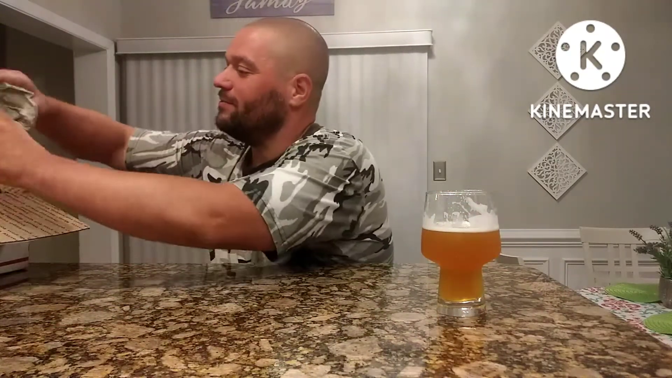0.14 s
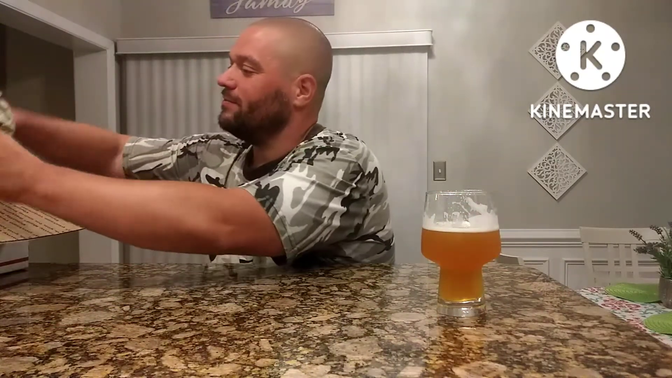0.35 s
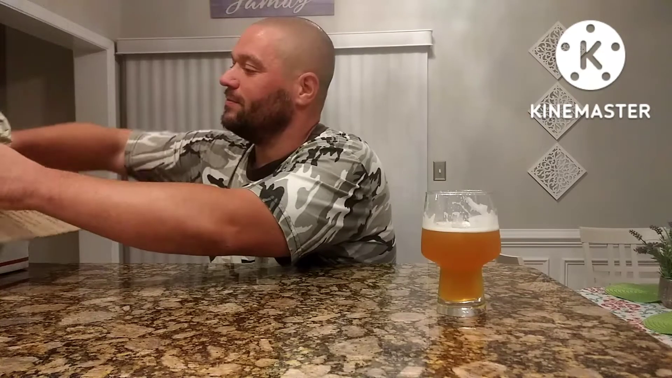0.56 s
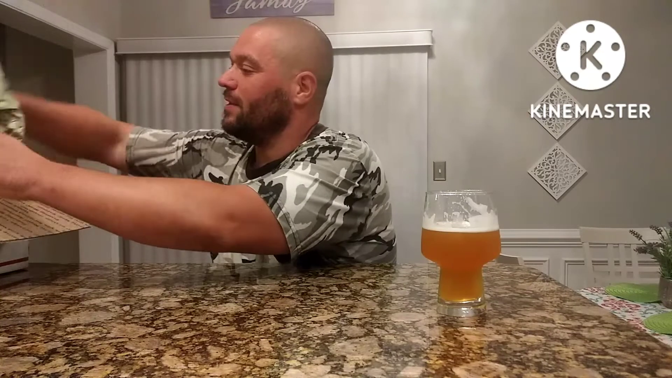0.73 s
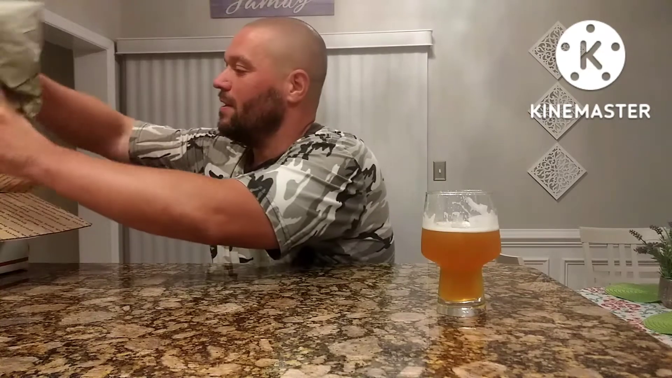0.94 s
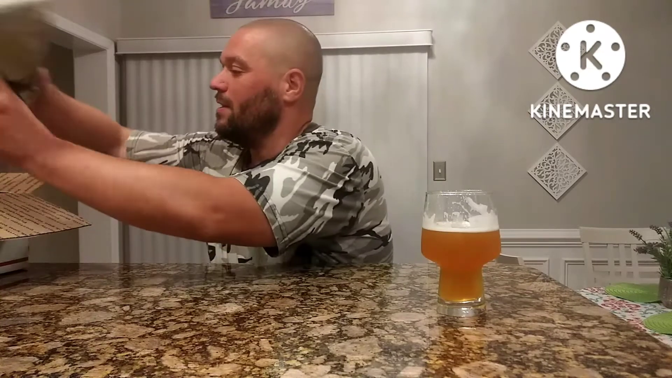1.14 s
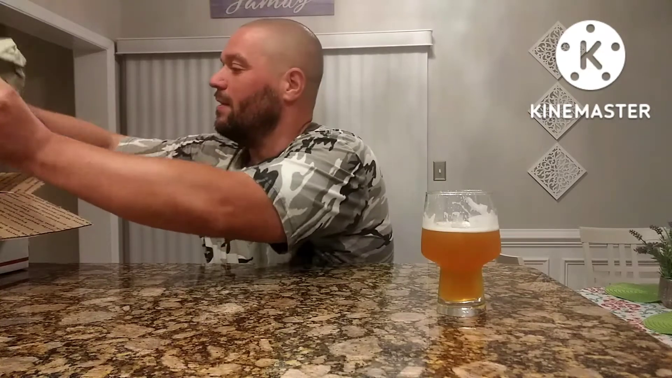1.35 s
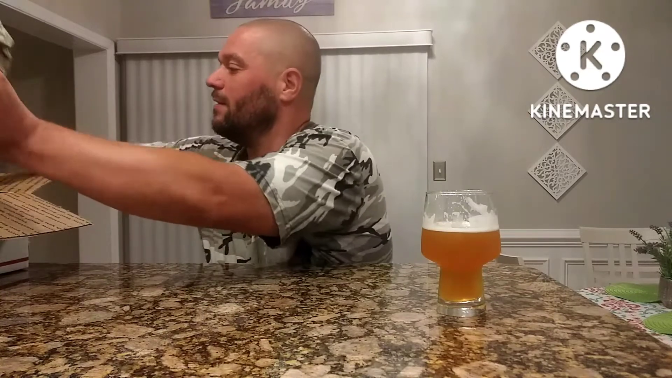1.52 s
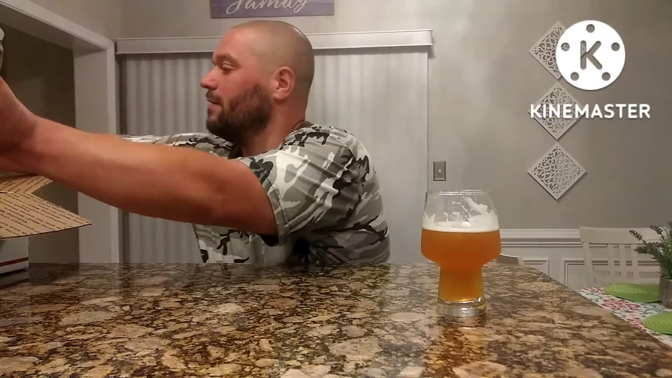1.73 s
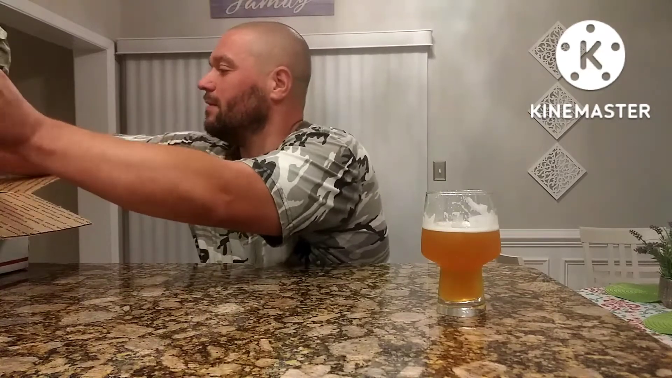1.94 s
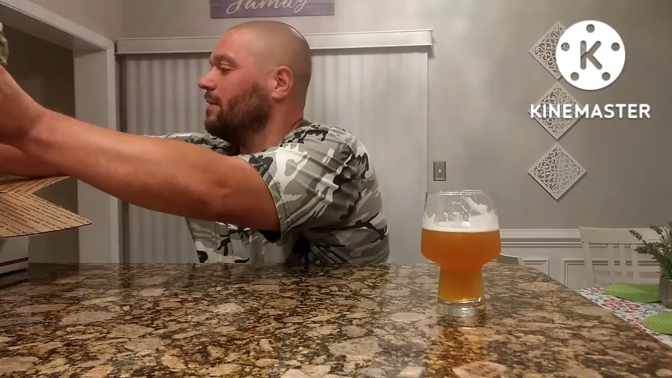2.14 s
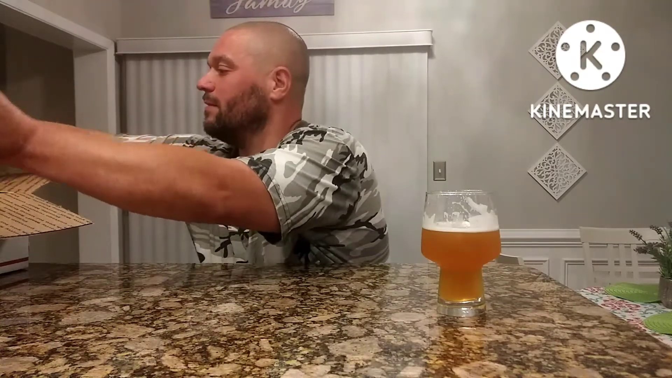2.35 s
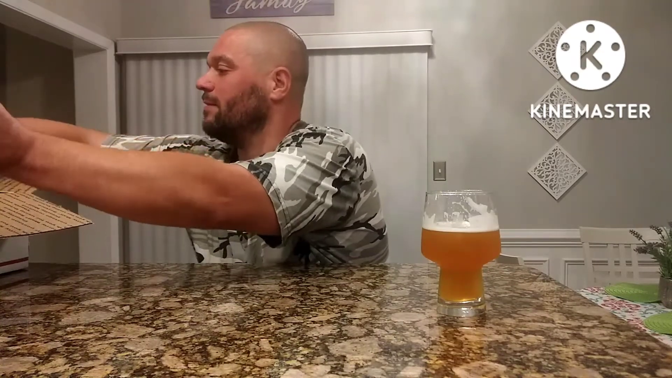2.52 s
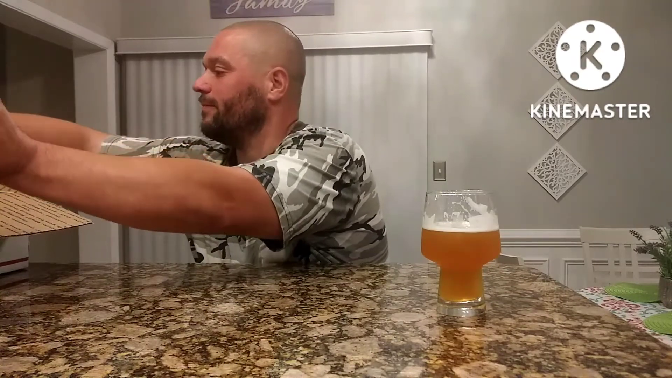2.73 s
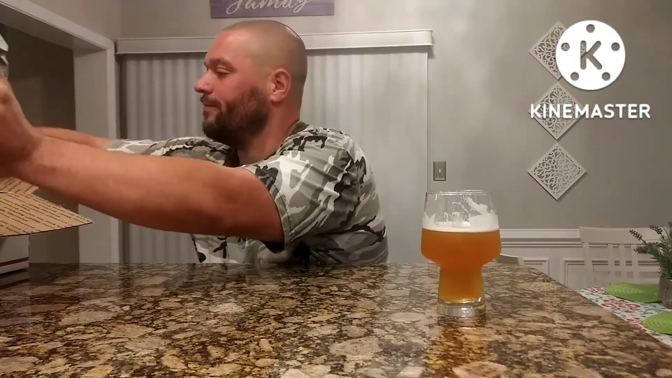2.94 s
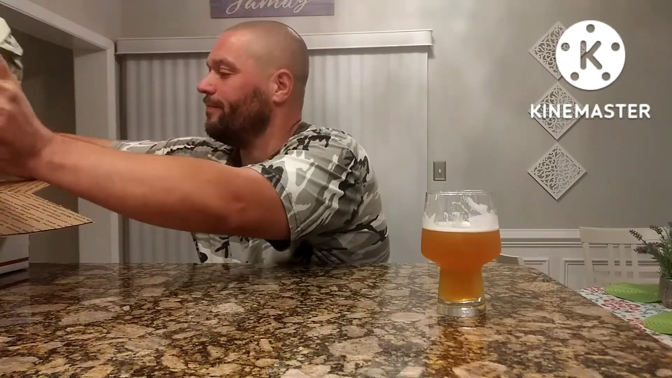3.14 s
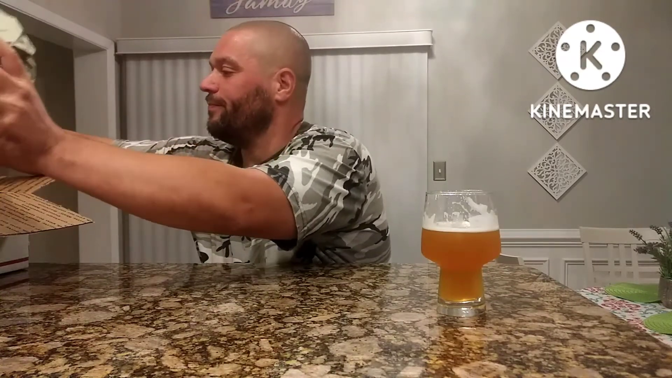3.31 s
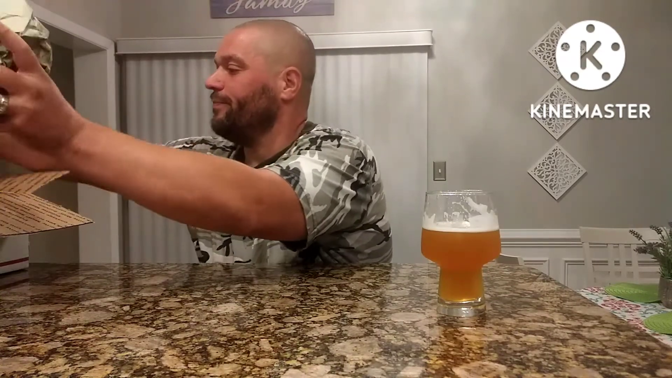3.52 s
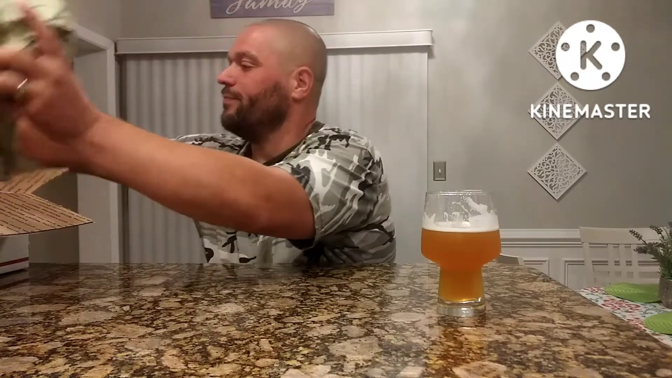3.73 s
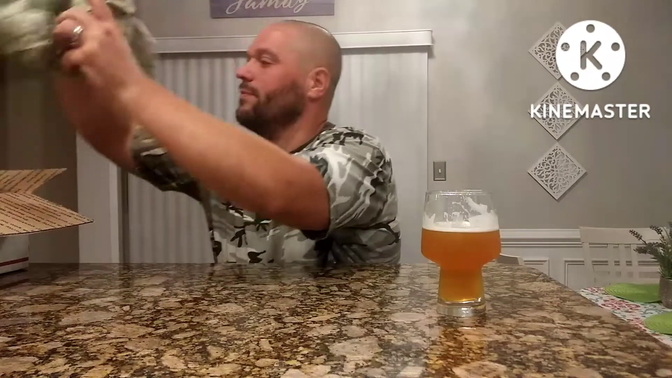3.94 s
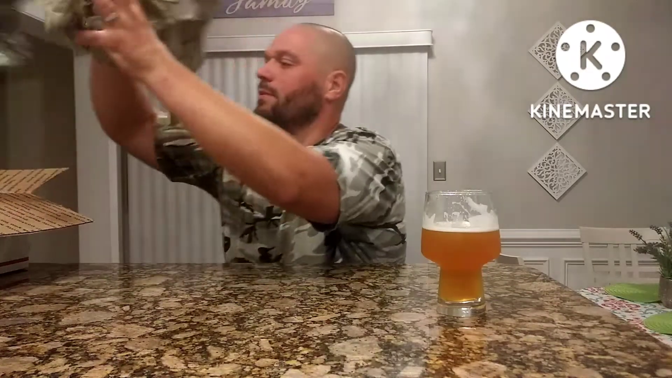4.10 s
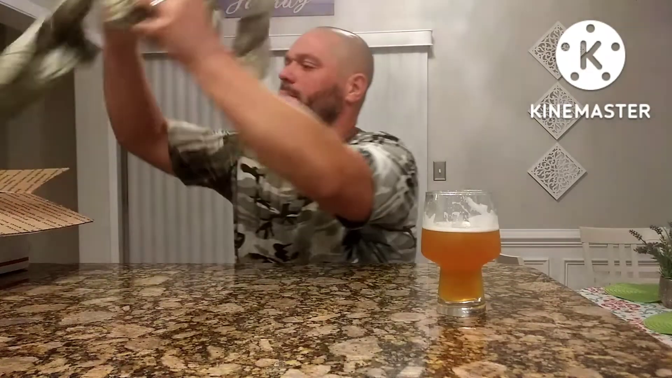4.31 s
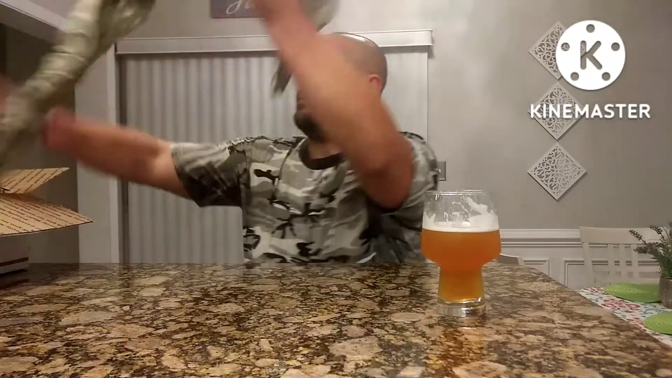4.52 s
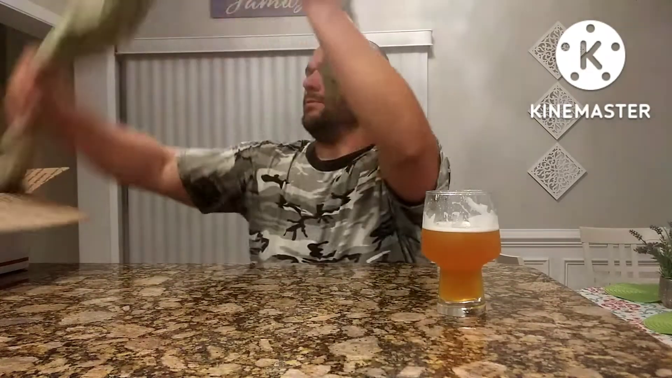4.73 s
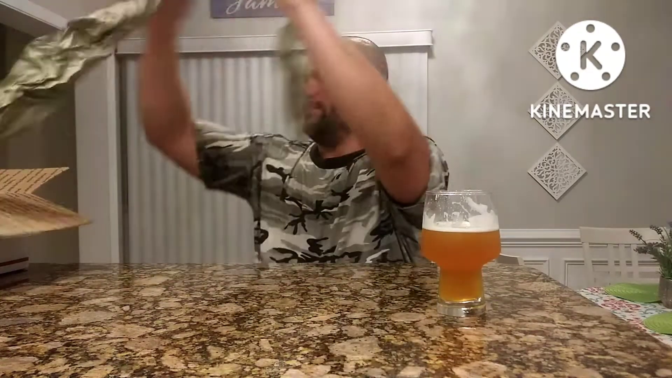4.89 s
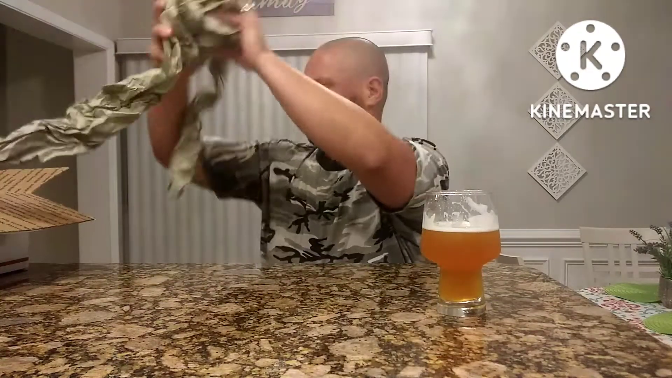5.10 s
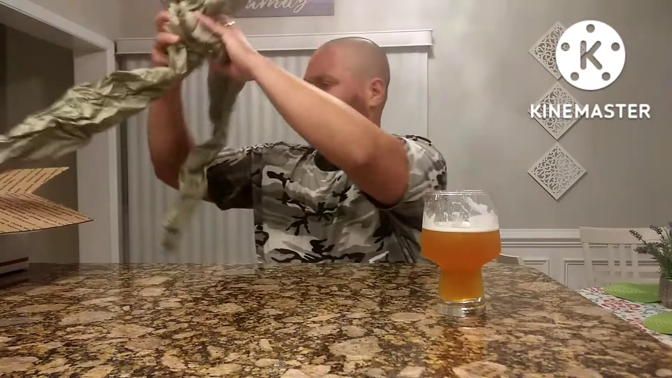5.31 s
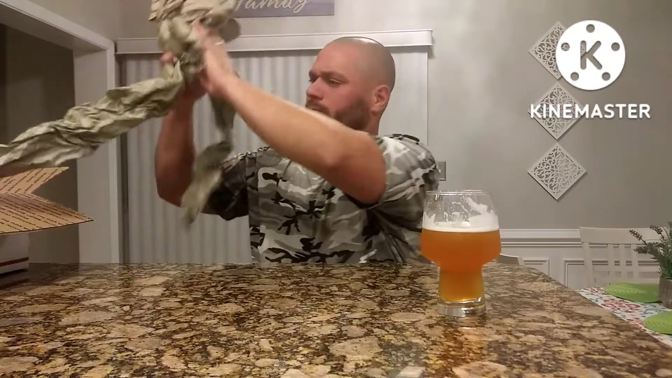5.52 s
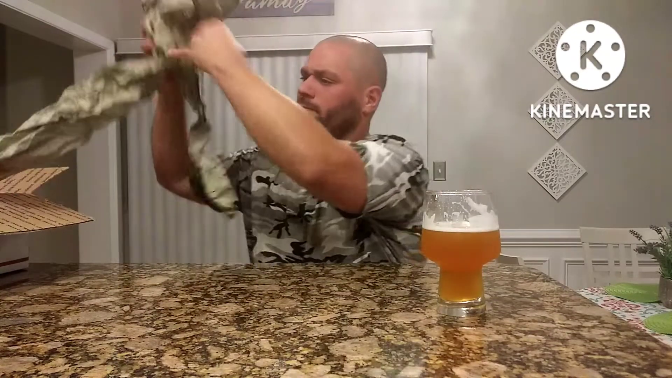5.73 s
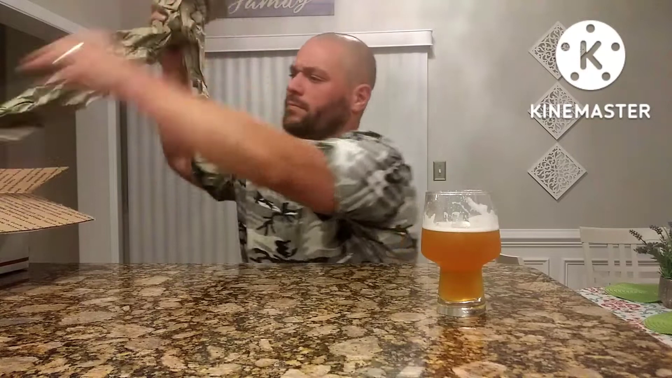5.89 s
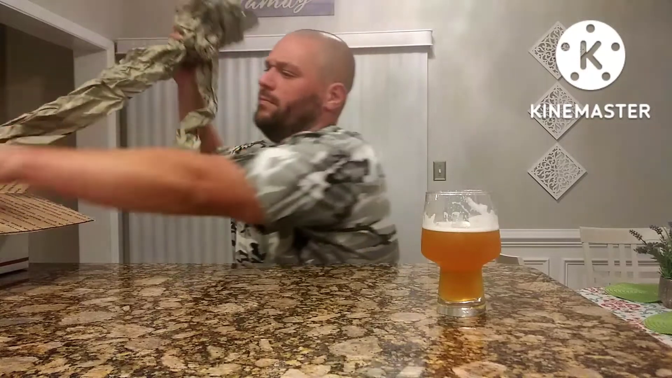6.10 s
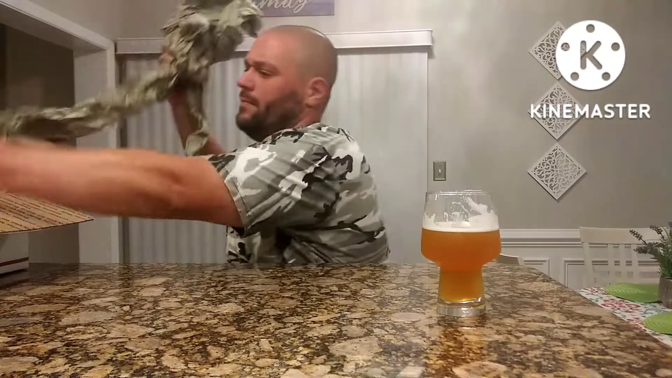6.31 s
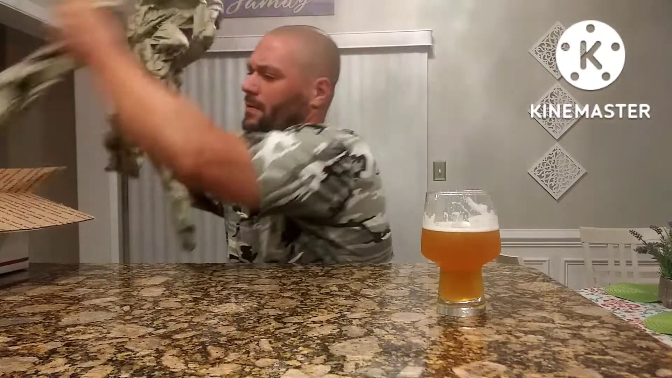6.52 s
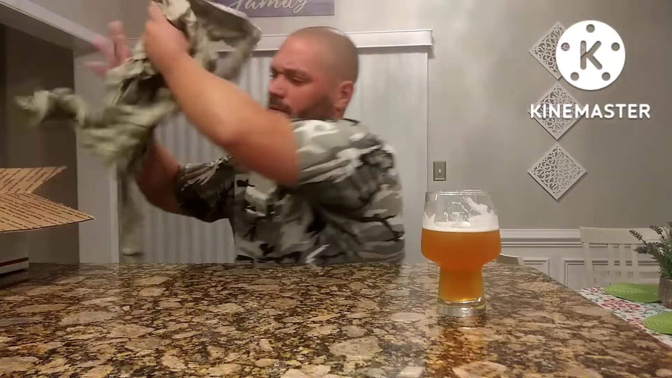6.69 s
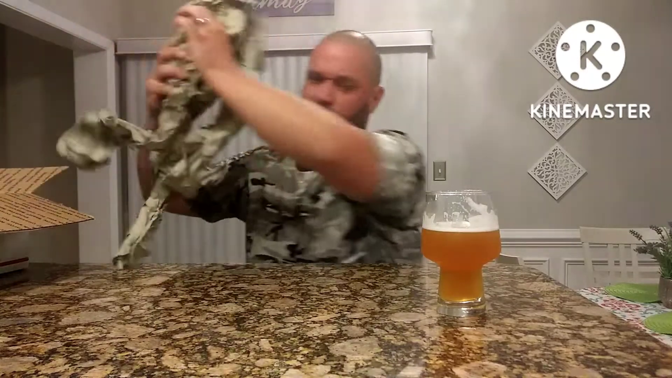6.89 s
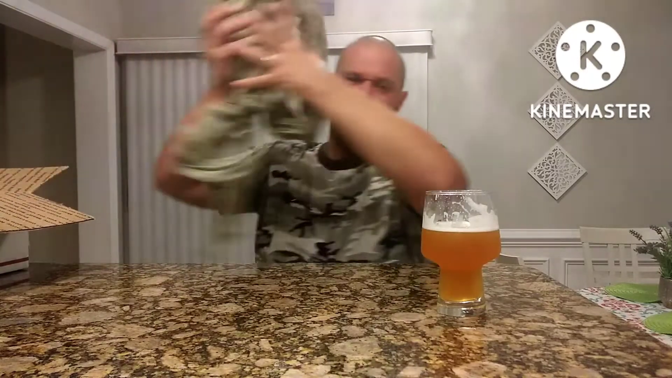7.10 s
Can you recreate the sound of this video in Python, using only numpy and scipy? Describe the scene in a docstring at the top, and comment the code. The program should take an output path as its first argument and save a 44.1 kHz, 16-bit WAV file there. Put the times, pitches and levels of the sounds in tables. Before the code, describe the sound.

Crumpled paper rustles and crackles in irregular bursts, catching briefly on a cardboard box with short stuttering rubs and small hollow knocks. It thins to light rustling around two seconds, then becomes denser and louder as the wad is gathered by hand, with bright pops and sudden crushes. Short lively kitchen reflections, very faint hum, single microphone.

```python
"""A long wad of crumpled packing paper is tugged out of a cardboard box and gathered up by hand in a kitchen.
A faint hum and air noise run throughout. Stiff creases snap from the start, over crackle that swells per tug.
From about 0.4 s the wad also catches on the box (stick-slip into wall resonances) and bumps it (short rings).
From 3.5 s firm tugs follow closely, with snaps and sudden crushes, and crackle lasts to the end.
Crackle is ringing random clicks in avalanches; the hard room blurs it all into a rustle at one microphone."""
import sys
import numpy as np
from scipy import signal
from scipy.io import wavfile

SR = 44100
rng = np.random.default_rng(int(sys.argv[2]) if len(sys.argv) > 2 else 0)


def put_to_file(sound):
    """Save the sound as 16-bit audio at rate SR, in the file named by the first command-line argument."""
    columns = np.atleast_2d(sound).T  # one column per channel
    safe = np.clip(columns, -1, 1)
    whole_steps = np.round(safe * 32767)
    wavfile.write(sys.argv[1], SR, whole_steps.astype(np.int16))


N = 315304
T = np.arange(N) / SR

# Colour of the paper. Each row: frequency in Hz, relative spectral level in dB.
PAPER_COLOUR = [(60, -59), (130, -28.5), (200, -25), (290, -14), (450, -3.5), (640, -4.5), (800, 0),
                (1000, 1), (1400, 1), (2800, 1), (3400, -1), (5100, 2.5), (7000, -6.5), (11000, -16.5),
                (15500, -27)]


def amp(db):
    """Decibels to gain."""
    return 10 ** (np.asarray(db) / 20)


def evened(x):
    """Scales to rms 1."""
    return x / np.sqrt(np.mean(x ** 2) + 1e-20)


def read(points, hz):
    """Reads a table on a log-frequency axis."""
    f, value = np.transpose(points)
    return np.interp(np.log(hz + 1), np.log(f), value)


def add(mix, start_s, sound):
    """Mixes a sound in at start_s, cut at the end of the mix."""
    part = mix[max(round(start_s * SR), 0):][:len(sound)]
    part += sound[:len(part)]


def filtered(x, order, hz, kind):
    """Causal Butterworth filter."""
    return signal.sosfilt(signal.butter(order, hz, kind, fs=SR, output="sos"), x)


def filtered_both_ways(x, order, hz, kind):
    """Zero-phase Butterworth filter, so that bands can be subtracted."""
    return signal.sosfiltfilt(signal.butter(order, hz, kind, fs=SR, output="sos"), x)


def coloured(x, points, size=4096):
    """Minimum-phase filter with the given spectrum, so that clicks keep their sharp fronts."""
    hz = abs(np.fft.fftfreq(size, 1 / SR))
    log_gain = np.log(amp(read(points, hz)))
    spectrum = np.exp(np.conj(signal.hilbert(log_gain)))
    taps = np.fft.ifft(spectrum).real[:size // 2]
    return signal.oaconvolve(x, taps)[:len(x)]


def resonate(x, hz, width_hz):
    """One resonance of peak gain 1."""
    hz = min(hz, 0.45 * SR)
    b, a = signal.iirpeak(hz, hz / min(width_hz, SR / 4), fs=SR)
    return signal.lfilter(b, a, x)


def clicks(n, per_s, spread_db, cap=4.0):
    """Random clicks of either sign: exponential spread in dB, upward if spread_db > 0, downward if < 0."""
    steps = np.minimum(rng.exponential(1, n), cap)
    sizes = amp(spread_db * steps) * rng.choice([-1, 1], n)
    return sizes * (rng.random(n) < per_s / SR)


def still_room(air_db=-62):
    """Faint coloured air noise and a steady hum of sine tones."""
    # Each row: frequency in Hz, relative spectral level in dB.
    air_colour = [(20, -1), (80, -5.5), (200, -10.5), (500, 5.5), (1500, -2.5), (5000, 1.5), (15000, -19)]
    # Hum of an appliance. Each row: frequency in Hz, rms level in dB ahead of the microphone.
    hum_tones = [(120, -87), (193, -89.5)]
    hum = sum(amp(db) * np.sqrt(2) * np.sin(2 * np.pi * (hz * T + rng.random())) for hz, db in hum_tones)
    air = evened(coloured(rng.standard_normal(N), air_colour))
    return hum + amp(air_db) * air


def kitchen(x, wet_db, gap_s=0.0042, counter_gain=0.36, size=256):
    """Direct sound, a glance off the stone counter and a dense tail; every call is another spot in the room."""
    # Reverberation. Each row: frequency in Hz, 60 dB decay time in s.
    decay_times = [(150, 0.29), (1000, 0.26), (4500, 0.29), (9000, 0.14), (15000, 0.28)]
    t = np.arange(SR // 2) / SR
    taps = rng.standard_normal(len(t)) * (rng.random(len(t)) < 1 / 8) * (t > gap_s)
    hz, age_s, bins = signal.stft(taps, SR, nperseg=size)
    decay = np.exp(-np.log(1000) * age_s / read(decay_times, hz)[:, None])
    tail = signal.istft(bins * decay, SR, nperseg=size)[1]
    response = amp(wet_db) * tail / np.linalg.norm(tail)
    response[0] += 1
    response[rng.integers(SR // 2000, SR // 300)] += counter_gain
    return signal.oaconvolve(x, response / np.linalg.norm(response))[:N]


def box(rise_share=0.078):
    """Paper sticks and slips on the cardboard, and each slip rings the walls of the box."""
    # The wad catches on the cardboard. Each row: start in seconds, relative level in dB, length in s.
    scrapes = [(0.436, -42.5, 0.054), (0.551, -37, 0.052), (2.246, -46, 0.036), (2.975, -35, 0.043),
               (3.016, -34.5, 0.034), (3.069, -36.5, 0.068), (4.623, -44, 0.021), (6.318, -38, .03),
               (6.864, -47, 0.019)]
    # Box walls and the air between them. Each row: frequency in Hz, width in Hz, relative gain in dB.
    wall_modes = [(175, 19, -34), (300, 23, -25), (427, 71, -11), (540, 124, 14.5), (735, 100, 20),
                  (800, 41, 5), (870, 43, -28.5), (1014, 56, 6)]
    drive = np.zeros(N)
    for start_s, db, length_s in scrapes:
        progress = np.arange(0, 1, 1 / (length_s * SR))
        slips = evened(clicks(len(progress), per_s=1700, spread_db=5.5))
        envelope = np.interp(progress, [0, rise_share, 1], [0, 1, 0.4])
        add(drive, start_s, amp(db) * slips * envelope)
    walls = sum(amp(db) * resonate(drive, hz, width_hz) for hz, width_hz, db in wall_modes)
    walls = filtered(walls, 2, 170, "high")  # a small box radiates no deep bass
    return drive.std() * evened(kitchen(walls, wet_db=-2.5))


def bumps(soft_share=0.04, rattle_share=0.6, size=6000):
    """Each bump is a soft knock with a short hollow ring; a light panel radiates little below its pitch."""
    # Broad facets pop over and the wad bumps the box. Each row: start in seconds, level in dB, pitch in Hz.
    knocks = [(0.572, -52, 265), (0.578, -21.5, 930), (0.772, -50, 228), (1.982, -36, 1030),
              (2.058, -33, 1400), (2.256, -33, 740), (2.412, -28, 1630), (3.014, -49, 199),
              (3.026, -18.5, 718), (3.064, -42, 187), (3.274, -25, 1090), (3.899, -47, 215),
              (4.623, -37, 263), (4.717, -23, 1070), (4.7722, -23.5, 1020), (4.915, -45, 252),
              (5.27, -30, 800), (6.085, -30.5, 590), (6.32, -38, 340), (6.4, -42, 260)]
    t60_at_1khz_s, shortening = 0.039, 0.47  # smaller, higher panels die sooner
    out, t = np.zeros(N), np.arange(size) / SR
    for start_s, db, hz in knocks:
        t60_s = t60_at_1khz_s * (1000 / hz) ** shortening
        rattle = evened(resonate(rng.standard_normal(size), hz, hz / 2))
        tone = np.sin(2 * np.pi * hz * t)
        ring = (tone + rattle_share * rattle) * np.exp(-np.log(1000) * t / t60_s)
        push = 1 - np.exp(-t / (soft_share * t60_s))
        knock = filtered(ring * push, 4, 0.99 * hz, "high")
        add(out, start_s, amp(db) * kitchen(knock, wet_db=-1.0))
    return out


def snaps(level_db=2, cycles=0.89, bright_hz=8000, after_db=-16, after_s=0.059, size=2000):
    """A stiff crease pops through in one sharp pulse and sets off its neighbours."""
    # Stiff creases that give way. Each row: start in seconds, level in dB ahead of level_db, pitch in Hz.
    stiff_creases = [(0.063, -35.5, 4550), (0.106, -29, 3900), (.143, -26, 1820), (0.8742, -22.5, 4500),
                     (0.959, -27, 2200), (1.039, -20, 3650), (1.263, -27, 4200), (1.6777, -18, 3370),
                     (2.2777, -29, 2800), (2.405, -26, 8400), (2.411, -32, 8600), (2.5092, -26, 4500),
                     (2.927, -22.5, 5070), (3.019, -24, 12000), (3.106, -31, 11000), (3.1612, -28.5, 7000),
                     (4.105, -30, 4570), (4.2603, -17.5, 4400), (4.558, -22, 4420), (4.627, -19, 2480),
                     (4.6431, -17, 3970), (5.4082, -29, 2600), (5.5043, -16, 2620), (6.083, -23, 2810),
                     (6.32, -15, 3000), (6.333, -16, 2800), (6.4948, -19, 4100), (6.6578, -24, 3980)]
    out, t = np.zeros(N), np.arange(size) / SR
    b, a = signal.butter(2, [500, min(bright_hz, SR / 3)], "band", fs=SR)
    for start_s, db, hz in stiff_creases:
        pop = np.cos(2 * np.pi * hz * t) * np.exp(-t * hz / cycles)
        pop = signal.lfilter(b, a, pop)
        chain = amp(after_db) * clicks(size, per_s=370, spread_db=-2.0) * np.exp(-t / after_s)
        chain[0] = 1
        snap = kitchen(signal.fftconvolve(chain, pop), wet_db=-4.0) / abs(pop).max()
        add(out, start_s, amp(db + level_db) * snap)
    return out


def grabs(size=8000):
    """The hands clench and a patch of paper crushes at once: a sudden dense burst of creases that thins out."""
    # Each row: start in seconds, level in dB, dying time (to 1/e) in s.
    clenches = [(0.105, -42.5, 0.033), (1.031, -39, 0.02), (1.679, -36, 0.0093), (2.277, -34, 0.024),
                (3.542, -38.5, 0.03), (4.558, -34, 0.054), (5.502, -37, 0.023), (6.082, -40, 0.022),
                (6.317, -44, 0.022)]
    out, t = np.zeros(N), np.arange(size) / SR
    for start_s, db, die_s in clenches:
        creases = evened(coloured(clicks(size, per_s=11000, spread_db=-1.5), PAPER_COLOUR))
        add(out, start_s, amp(db) * kitchen(creases * np.exp(-t / die_s), wet_db=0.0))
    return out


def working():
    """Each tug tightens, then slackens; gives the gains of broad folds, crackle and fine fizz."""
    # Tugs or squeezes of the wad. Each row: start in seconds, crackle level in dB, tightening time in s,
    # slackening time in s, extra flexing of broad folds in dB, extra fizz of fine creases in dB.
    tugs = [(0.08, -37, 0.08, 0.22, -4, 1), (0.38, -37.5, 0.048, 0.19, 4.5, -2.5),
            (0.5, -34.5, 0.065, 0.3, 5.5, 0), (0.62, -43.5, 0.094, 0.61, 2.5, -1),
            (1.019, -33.5, 0.017, 0.69, -3, -0.5), (1.3, -33, 0.07, 0.13, 2.5, 4.5),
            (1.43, -42.5, 0.033, 0.81, -0.5, -0.5), (1.94, -44.5, 0.028, .16, 5, -3),
            (2.02, -46.5, 0.093, 0.64, 8, -1), (2.33, -48, 0.042, 0.08, 13.5, 4),
            (2.49, -41.5, 0.09, 0.37, 4.5, 0), (2.898, -38.5, 0.081, 0.41, 4.5, -1.5),
            (3.238, -40.5, 0.023, .11, 10.5, -1.5), (3.518, -39.5, 0.11, 0.29, 4.5, 3.5),
            (3.661, -32.5, 0.074, .13, 4.5, -0.5), (3.78, -34, 0.06, 0.58, 1.5, 1),
            (4.0, -33, 0.075, 0.59, -4, -2), (4.179, -31.5, 0.1, 0.18, 1, 1),
            (4.39, -36, 0.048, 0.12, -9.5, 2), (4.559, -35, .12, 0.74, 1, 1),
            (4.869, -30.5, 0.073, 0.29, -2.5, 0), (5.071, -36.5, 0.078, 0.71, -5.5, -5),
            (5.29, -37, 0.11, 0.83, -6, -3), (5.489, -32, 0.13, 0.22, 1, -1),
            (5.741, -34, 0.047, 0.21, 0, 3), (6.048, -38.5, 0.02, 1, 1.5, -1),
            (6.25, -33, 0.056, 0.26, 3, 1), (6.371, -37.5, 0.06, 0.26, -5.5, 3),
            (6.579, -31.5, 0.066, 0.31, 2.5, -1.5), (6.71, -36, 0.087, 0.51, -3, -2),
            (7.075, -32.5, 0.049, .2, 1, -3)]
    slacken_power = 1.434  # a tug lets go quickly at first, then trails off
    held_db, take_hold_s = -49, 0.11  # the wad creaks on while it is merely held
    firm_db = -33.5  # crackle level of a firm tug
    firm_flex_db, flex_growth = -45, 0.66  # broad folds bend even under a light hand; growth in dB per dB
    firm_fizz_db, fizz_growth = -45.5, 0.94  # fine creases need force; growth in dB per dB
    held = amp(held_db) * np.minimum(T / take_hold_s, 1)
    strokes = [(held, 0, 0)]
    for start_s, db, tighten_s, slacken_s, flex_db, fizz_db in tugs:
        rise = np.clip((T - start_s) / tighten_s, 0, 1)
        fall = np.clip(1 - (T - start_s - tighten_s) / slacken_s, 0, 1) ** slacken_power
        strokes.append((amp(db) * rise * fall, flex_db, fizz_db))
    power = np.zeros((3, N))
    for gain, flex_db, fizz_db in strokes:
        on = gain > 0
        force = gain[on] / amp(firm_db)
        flex = amp(firm_flex_db + flex_db) * force ** flex_growth
        fizz = amp(firm_fizz_db + fizz_db) * force ** fizz_growth
        power[:, on] += np.square([flex, gain[on], fizz])
    return np.sqrt(power)


def avalanches(per_s=12, die_s=0.011, spread_db=1.13, steady=0.56):
    """One crease sets off others: the activity jumps and dies away, over a steady trickle."""
    triggers = clicks(N, per_s, spread_db, cap=4.8) ** 2
    activity = signal.lfilter([1], [1, -np.exp(-1 / (die_s * SR))], triggers)
    return np.sqrt(steady + activity / (activity.mean() + 1e-12))


def buckling(hz, per_s, spread_db=3.5, ring_db=6, damping=0.39):
    """A facet of the paper ticks as it flips and rings for a cycle or two at a pitch set by its size."""
    flips = clicks(N, per_s, spread_db, cap=3.58) / np.sqrt(per_s)
    return evened(flips + amp(ring_db) * resonate(flips, hz, hz * damping))


def rustle(fold_hz=1100, fine_hz=7200, slide_db=-9, flex_db=-2, crackle_db=0, crisp_db=0, count=14):
    """Facets all along the wad crackle in little avalanches, each from its own spot in the room."""
    flex, effort, crisp = working()
    gains = [flex * amp(flex_db), effort * amp(crackle_db), crisp * amp(crisp_db)]
    flips_per_s = 330 * (effort / effort.max() + 1e-6) ** 0.3  # a harder pull buckles more creases a second
    out = np.zeros(N)
    for hz in np.geomspace(700, 13500, count):
        sliding = amp(slide_db) * rng.standard_normal(N)  # sheet rubbing on sheet
        sheet = coloured((buckling(hz, flips_per_s) + sliding) * avalanches(), PAPER_COLOUR)
        folds = filtered_both_ways(sheet, 1, fold_hz, "low")
        fine = filtered_both_ways(sheet, 4, fine_hz, "high")
        bands = (folds, sheet - folds - fine, fine)
        paper = sum(gain * evened(band) for gain, band in zip(gains, bands))
        out += kitchen(paper, wet_db=3.0)
    return out / np.sqrt(count)


def scene():
    """The handling stirs the room's standing waves; with the still room it is alike in both channels."""
    # Waves between counter, cabinets and walls. Each row: frequency in Hz, width in Hz, strength in dB.
    standing_waves = [(284, 20, -5.5), (390, 17, -23), (599, 27, -3), (715, 7, -13.5), (894, 31, -3.5),
                      (1005, 39, -5)]
    handling = box() + bumps() + snaps() + grabs() + rustle()
    standing = sum(amp(db) * resonate(handling, hz, width_hz) for hz, width_hz, db in standing_waves)
    return np.tile(handling + standing + still_room(), (2, 1))


def record(dry, low_cut_hz=105, edge_hz=15600):
    """The microphone's bass roll-off, then the band limit."""
    thin = filtered(dry, 2, low_cut_hz, "high")
    band_limit = signal.firwin(511, edge_hz, window=("kaiser", 9), fs=SR)
    return signal.oaconvolve(thin, band_limit[None], "same")


dry = scene()
out = record(dry)
put_to_file(out)
```